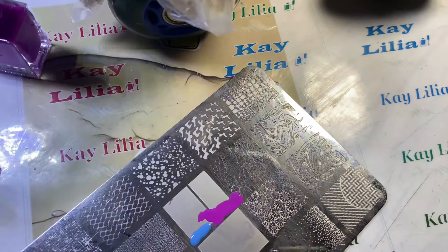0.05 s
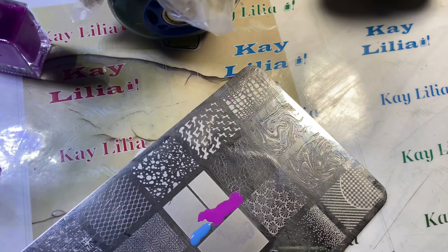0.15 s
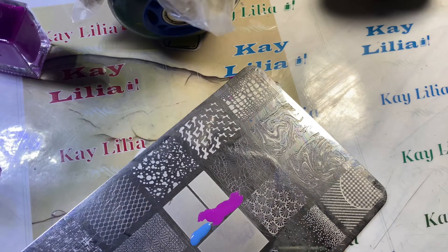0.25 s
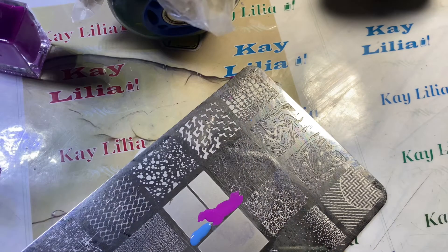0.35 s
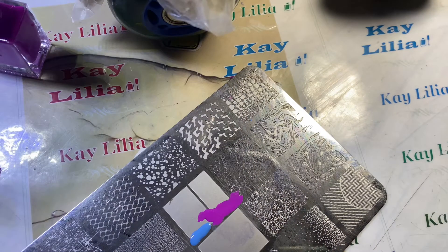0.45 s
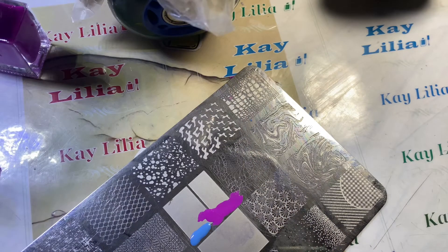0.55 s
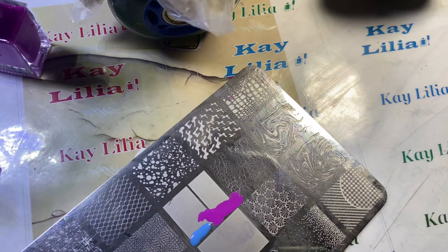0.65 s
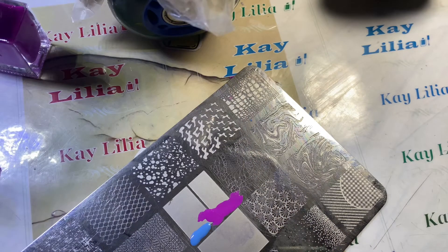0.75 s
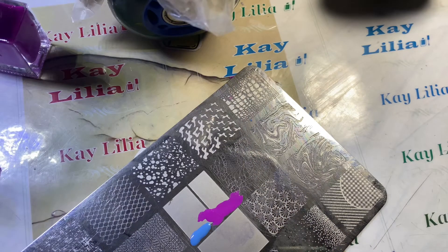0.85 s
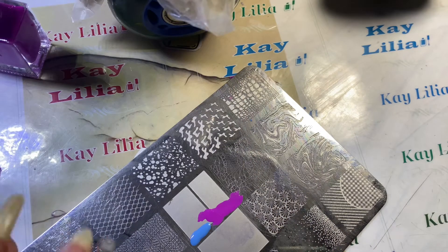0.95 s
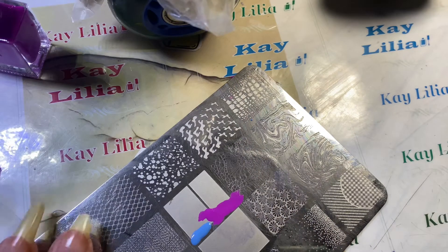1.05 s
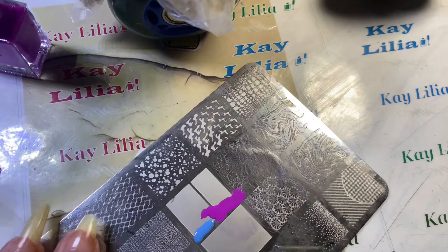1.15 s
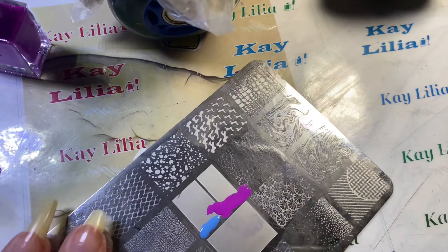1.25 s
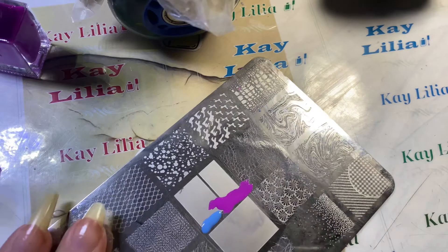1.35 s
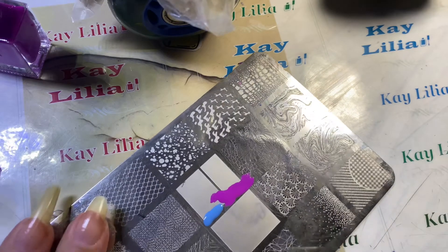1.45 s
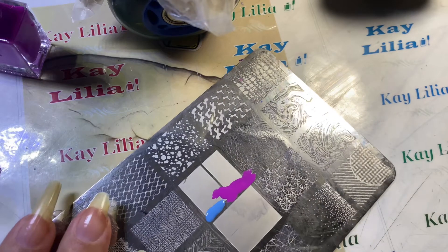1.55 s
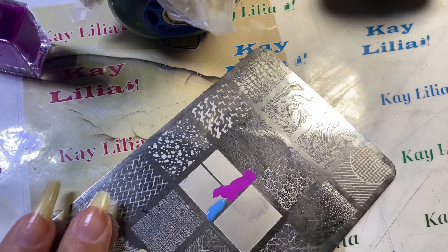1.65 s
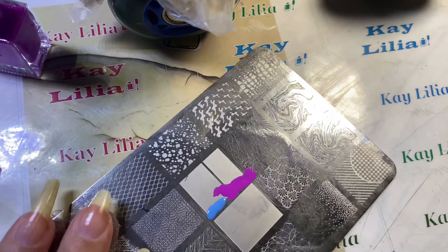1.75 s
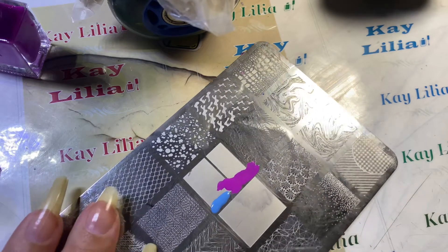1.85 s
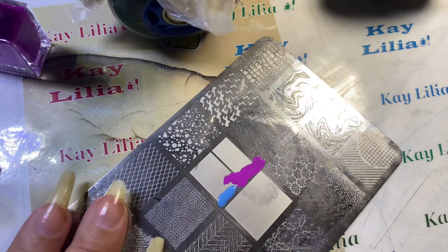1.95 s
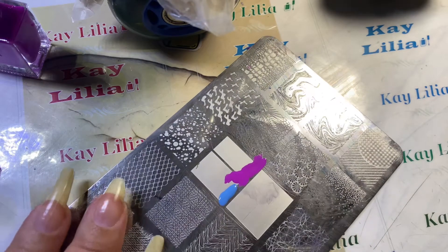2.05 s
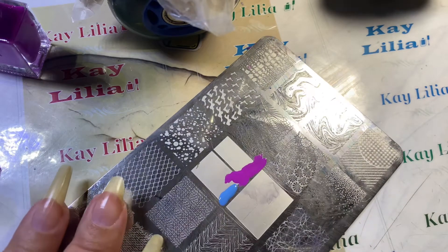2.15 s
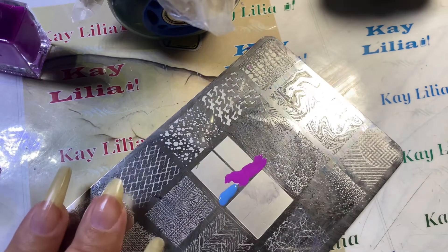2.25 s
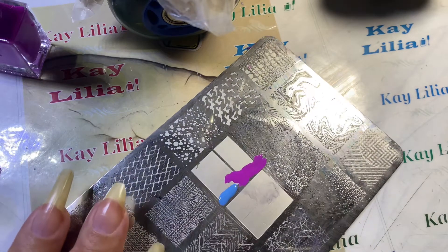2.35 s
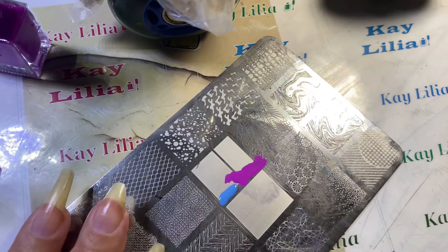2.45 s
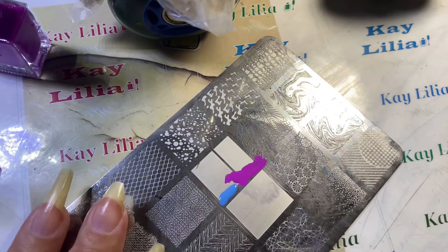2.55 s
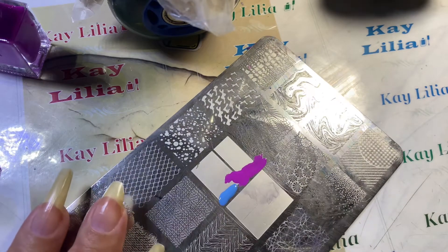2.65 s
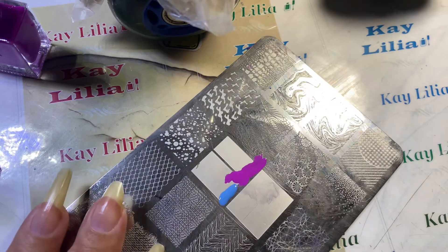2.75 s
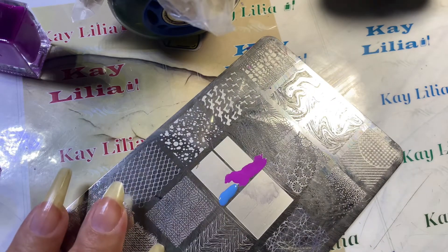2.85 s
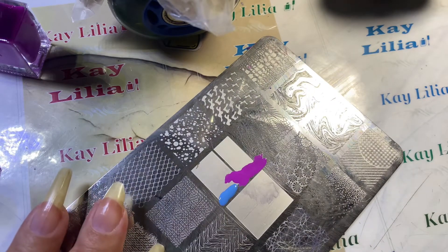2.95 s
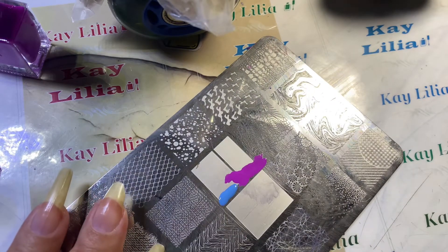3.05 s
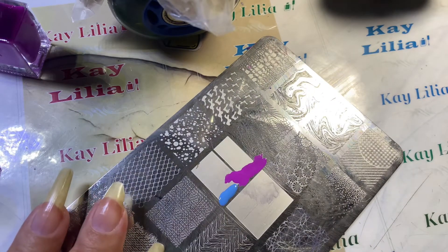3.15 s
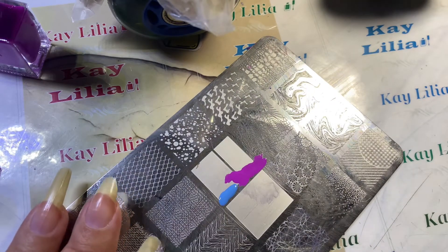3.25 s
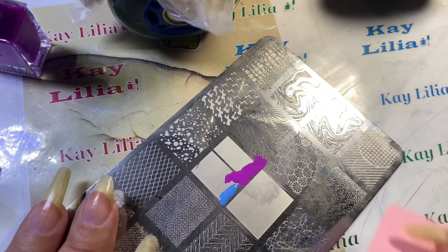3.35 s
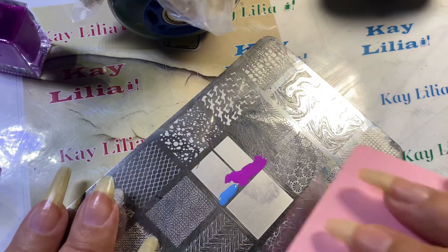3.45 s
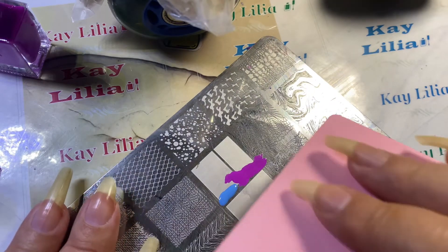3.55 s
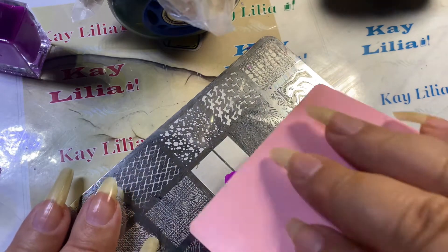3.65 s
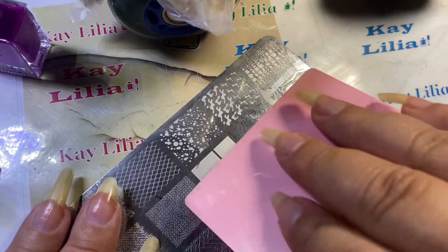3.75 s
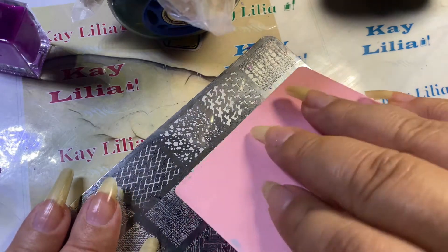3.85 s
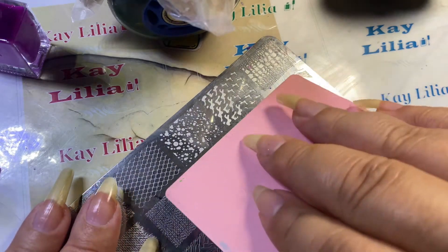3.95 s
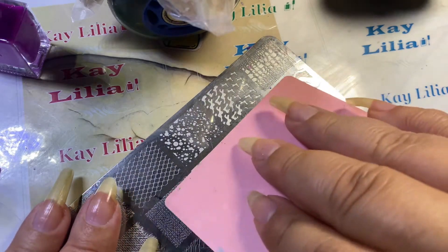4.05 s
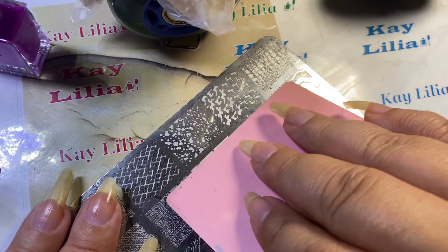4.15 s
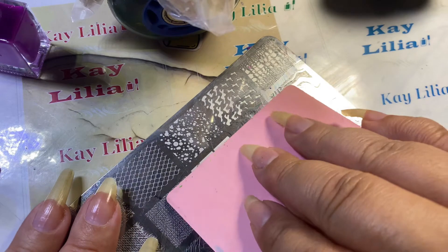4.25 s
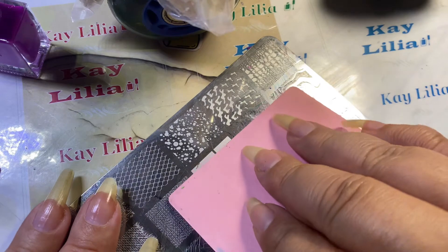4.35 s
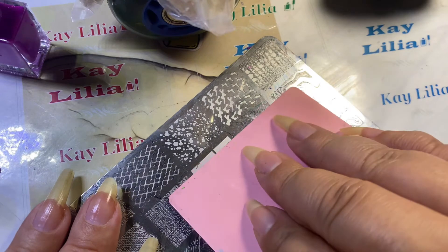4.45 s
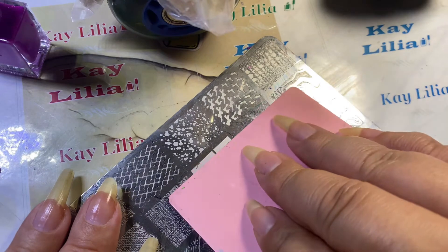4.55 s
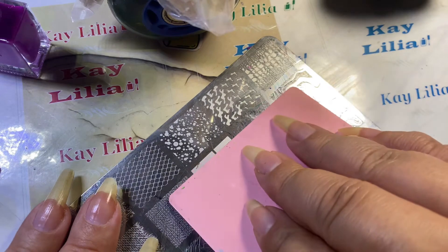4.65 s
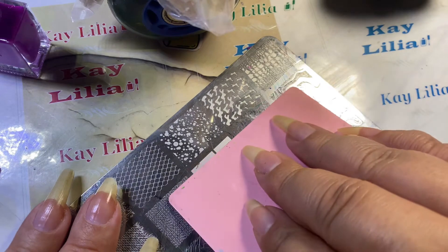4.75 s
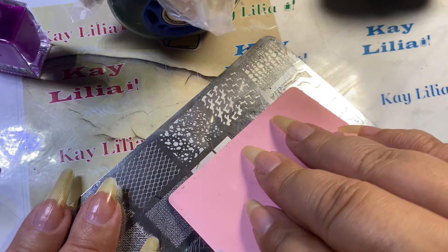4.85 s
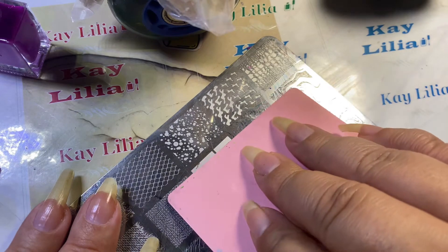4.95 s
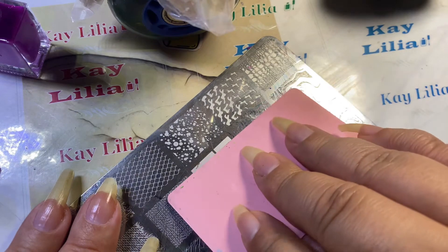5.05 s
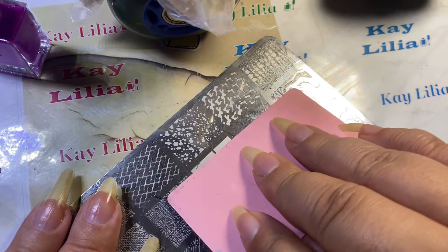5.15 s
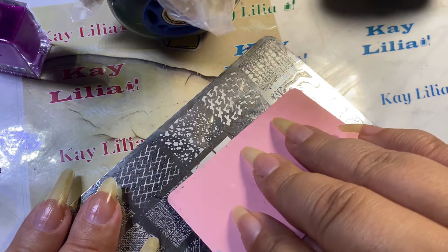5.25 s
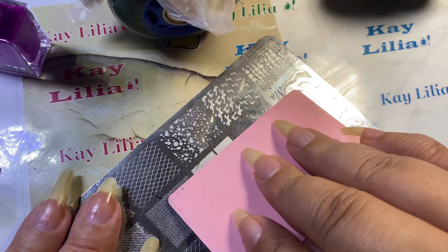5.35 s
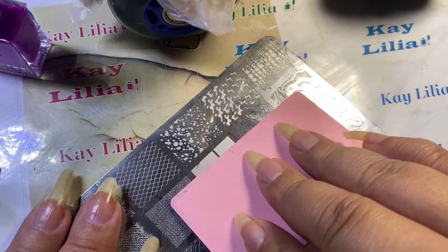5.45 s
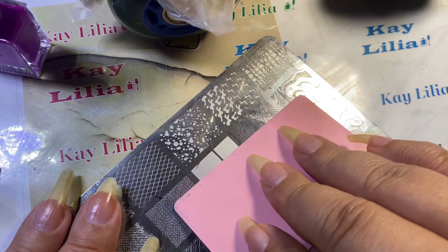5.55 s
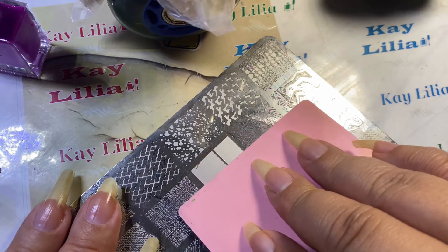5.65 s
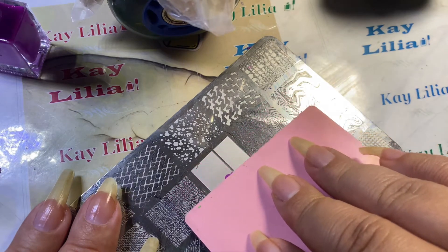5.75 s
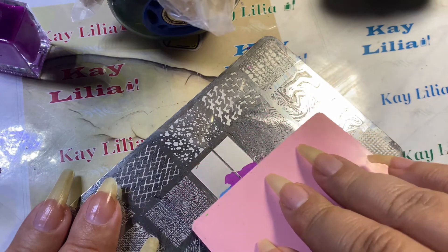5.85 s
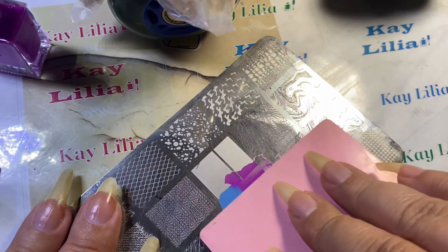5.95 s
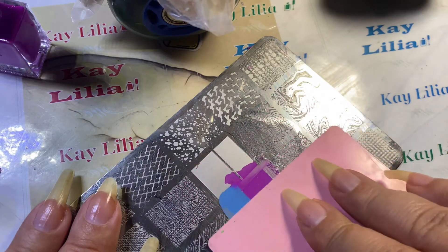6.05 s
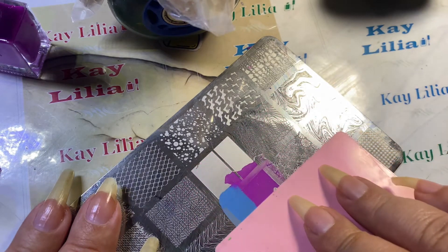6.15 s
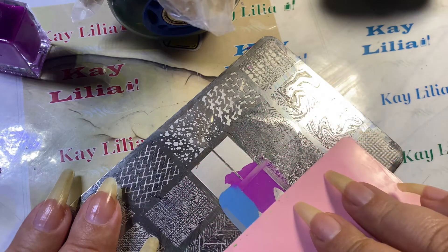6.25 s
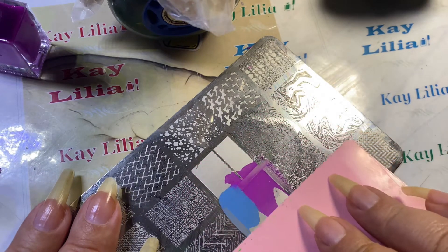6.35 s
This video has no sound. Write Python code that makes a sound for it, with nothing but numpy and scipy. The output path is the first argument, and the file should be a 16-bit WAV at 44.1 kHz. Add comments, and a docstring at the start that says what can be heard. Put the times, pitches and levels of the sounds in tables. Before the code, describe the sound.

Over steady motor hum, light nail clicks and brief brushing shuffles give way to a card's clack, one swelling scrape and a bright snap.

```python
"""From the start, appliance motors hum as steady sine tones in a small room, over fan rumble made of noise.
Long fingernails tick on a thin steel plate (impulses ringing its resonances), and fingers slide it over a
plastic-covered craft table (noise in short pushes). After 3.6 s a plastic card is set down on the plate.
At about 4.2 s one more motor starts and beats slowly against the lowest hum tone.
From 5.2 s the card is drawn across the plate in one rasping stroke, and it snaps over an edge at 5.9 s."""
import sys
import numpy as np
from scipy import signal
from scipy.fft import rfft, irfft
from scipy.io import wavfile
from scipy.ndimage import map_coordinates

SR = 44100
rng = np.random.default_rng(int(sys.argv[2]) if len(sys.argv) > 2 else 0)


def int16_out(signal):
    """Quantize to a 16-bit WAV file."""
    q = np.round(np.clip(np.atleast_2d(signal).T, -1, 1) * 32767)
    wavfile.write(sys.argv[1], SR, q.astype(np.int16))


N = 281799

# Resonances of the plate, damped by table and fingers.
# Each row: pitch in Hz, width in Hz, level in dB.
PLATE_MODES = [(500, 220, -13), (870, 200, -1), (1280, 500, -2), (2150, 750, 0), (3400, 700, -3),
               (4700, 1000, -2), (6700, 700, -4), (8200, 900, -8), (10000, 1000, -8), (11600, 800, -13),
               (13200, 1200, -24), (14900, 600, -24)]
# Resonances of card and plate ringing together. Each row: pitch in Hz, width in Hz, level in dB.
CARD_MODES = [(974, 50, -3), (1135, 110, -1), (1300, 160, -11), (1915, 80, -5), (2420, 110, -7),
              (2675, 80, -3), (2950, 130, 2), (3275, 110, -1), (3572, 100, -8), (4300, 160, -10),
              (4620, 220, -6), (4930, 240, -6), (6050, 130, -11), (6595, 120, -7), (7030, 80, -12),
              (7400, 130, -11), (10020, 150, -7), (12100, 120, -12), (15200, 250, -24)]
# How restless the hands are between pushes. Each row: time in seconds, relative level in dB.
RESTLESSNESS = [(0, 8), (0.35, -6), (0.55, -14), (0.9, 1.5), (1.3, -2), (1.45, 2), (1.6, -13), (2.2, 1),
                (2.5, -8.5), (2.8, -1), (3.8, -12.5), (4.6, -15), (6.39, -27)]

# the last motor, and the moment when all hum tones are in step
MOTOR_HZ, MOTOR_START_S, IN_STEP_S = 59.08, 4.16, 5.0
ROOM_T60_S = 0.22  # time for the wall echoes to fall by 60 dB
CUTOFF_HZ = 16000
# reflections from hands and table, just behind each nail contact
SCATTER_DB, SCATTER_T60_S = -0.5, 0.01
NAIL_LAG_S = 0.00004  # delay of a nail's impulse at the right microphone
# every push takes hold over a share of its length, slows under friction and dies away
PUSH_ATTACK_SHARE, PUSH_SAG_DB_PER_S, PUSH_RELEASE_DB_PER_S = 0.42, 29.5, 276
# the card's stroke speeds up and slows down in a half sine; its loudness follows a power of speed
STROKE_START_S, STROKE_LENGTH_S, STROKE_SPEED_POWER = 5.157, 1.454, 3.1
# rubbing resonances: width as a share of pitch, and how far and how often they wander
RUB_WIDTH_SHARE, RUB_WANDER_OCTAVES, RUB_WANDERS_PER_S = 0.1, 0.045, 22
# the shifting contact makes patches of the spectrum flicker
SLIDE_PATCH_DB, EDGE_PATCH_DB, PATCHES_PER_S, PATCHES_PER_OCTAVE = 2.8, 1.5, 50, 10


def from_db(db):
    """Decibels to gain."""
    return 10 ** (np.asarray(db) / 20)


def rms_one(x):
    """Scale to an average (rms) level of 1."""
    return x / np.sqrt(np.mean(x ** 2) + 1e-20)


def seconds(size):
    """A time axis."""
    return np.arange(size) / SR


def level_curve(rows):
    """Gain along rows of time in seconds and level in dB, practically silent outside them."""
    return from_db(np.interp(seconds(N), *np.transpose(rows), left=-140, right=-140))


def at_hz(points, hz):
    """Read a table along pitch, where each octave counts as an equal step."""
    table = np.array(points)
    return np.interp(np.log(np.maximum(hz, 1)), np.log(table[:, 0]), table[:, 1])


def coloured(x, spectrum):
    """Give a steady sound a spectrum and an rms level of 1."""
    gain = from_db(at_hz(spectrum, np.fft.rfftfreq(N, 1 / SR)))
    return rms_one(irfft(rfft(x) * gain, N))


def cut(x, hz, kind):
    """Butterworth filter of design order 2."""
    return signal.sosfilt(signal.butter(2, hz, kind, fs=SR, output="sos"), x)


def drift(rate):
    """Random wandering with spread 1, aiming at a new value `rate` times a second."""
    knots = rng.standard_normal(4000)
    return np.interp(seconds(N) * rate, np.arange(len(knots)), rms_one(knots))


def panned(x, left_db):
    """Shift a sound to the left by a level difference."""
    return x * from_db([[left_db / 2], [-left_db / 2]])


def add(track, s, sound):
    """Mix a short sound in at a time."""
    start = round(s * SR)
    track[:, start:start + sound.shape[1]] += sound[:, :N - start]


def stereo(pair, likeness):
    """Blend two unrelated noises into left and right, as alike as a table says."""
    alike = np.clip(at_hz(likeness, np.fft.rfftfreq(N, 1 / SR)), -1, 1)
    mid, side = rfft(pair)
    return irfft(np.sqrt(1 + alike) * mid + np.sqrt(1 - alike) * side * [[1], [-1]], N)


def resonate(x, modes):
    """Resonances side by side, each ringing at its own pitch, added with alternating signs."""
    out = 0
    for k, (hz, width, db) in enumerate(modes):
        r = np.exp(-np.pi * width / SR)  # a wider resonance dies away faster
        feed = np.array([1, 0, -1]) * (1 - r * r) / 2
        feedback = [1, -2 * r * np.cos(2 * np.pi * hz / SR), r * r]
        ring = signal.lfilter(feed, feedback, x + 1e-18)
        out = out + (-1) ** k * ring * from_db(db)
    return out


def contact(lag_s):
    """A sharp impulse, later at the right microphone, with dense reflections from hands and table."""
    t = seconds(size=6000)
    scatter = rng.standard_normal((2, len(t))) * from_db(-60 * t / SCATTER_T60_S)
    hit = from_db(SCATTER_DB) * rms_one(scatter) / np.sqrt(len(t))
    hit[[0, 1], [0, round(abs(lag_s) * SR)]] += 1
    return hit


def dispersed(bounce, longest_s):
    """A sharp impulse smeared by quick bounces inside the card, which leave its colour unchanged."""
    hit = signal.unit_impulse(6000)
    for delay in (rng.uniform(.3, 1, 3) * longest_s * SR).astype(int):
        loop = np.r_[1, np.zeros(delay), bounce]
        hit = signal.lfilter(loop[::-1], loop, hit)  # allpass: delays pitches without changing levels
    return hit[None]


def friction(per_s, grain_db, smooth_db):
    """Tiny slips of uneven size over a smooth rubbing hiss, as two unrelated noises."""
    sizes = from_db(grain_db * np.minimum(rng.exponential(1, N), 2.8))
    slips = (rng.random(N) < per_s / SR) * sizes
    grains = rms_one(slips * rng.standard_normal((2, N)))
    return grains + from_db(smooth_db) * rng.standard_normal((2, N))


def rubbed(pair, colour, resonances, patch_db):
    """Colour a rub by a spectrum and by resonances that wander and flicker as the contact shifts."""
    hz, t, cells = signal.stft(pair, SR, nperseg=384)
    power = 1
    for centre, height_db in resonances:
        path = np.interp(t * RUB_WANDERS_PER_S, np.arange(400), rng.standard_normal(400))
        detune = hz[:, None] / (centre * 2 ** (RUB_WANDER_OCTAVES * path)) - 1
        power = power + from_db(height_db) ** 2 / (1 + (2 * detune / RUB_WIDTH_SHARE) ** 2)
    octaves = np.log2(1 + hz / 100)
    places = np.meshgrid(octaves * PATCHES_PER_OCTAVE, t * PATCHES_PER_S, indexing="ij")
    # the patch grid ends near 7.8 kHz; above that nothing flickers
    patches = map_coordinates(rng.standard_normal((64, 400)), places, order=1)
    gain = np.sqrt(power) * from_db(at_hz(colour, hz)[:, None] + patch_db * rms_one(patches))
    return rms_one(signal.istft(cells * gain, SR)[1][:, :pair.shape[1]])


def radiated(x):
    """Each register of the card leans to one microphone in level and is ahead in phase at the left."""
    # How the card's sound leans. Each row: pitch in Hz, left minus right in dB.
    balance = [(700, -9), (1290, -3), (2380, 2.5), (4400, 6), (8120, -2.5), (15000, 1.5)]
    # How far it leads at the left microphone. Each row: pitch in Hz, lead in radians.
    phase = [(0, 1), (340, 3.5), (1120, 4.5), (3100, 10.5), (4820, 19), (5250, 23.5), (7580, 17.5),
             (8180, 16.5), (9560, 16), (10400, 12), (11600, 11), (13800, 10.5), (14600, 11), (16500, 5)]
    hz = np.fft.rfftfreq(N, 1 / SR)
    left_db = at_hz(balance, hz)
    lead = np.interp(hz, *np.transpose(phase))
    gain = from_db([left_db / 2, -left_db / 2])
    return irfft(rfft(x) * gain * np.exp(np.array([lead, -lead]) * 1j / 2), N)


def room_air(level_db):
    """Fan rumble and air: noise strongest in the bass, where the two channels are most alike."""
    # Spectrum of the air. Each row: pitch in Hz, relative level in dB per Hz.
    spectrum = [(25, -18), (38, -6), (48, -6), (65, -1), (95, -7.5), (128, 2), (168, -8.5), (186, -1.5),
                (222, -9.5), (262, -9.5), (305, -10), (380, -15.5), (650, -24.5), (1100, -22.5),
                (1450, -29), (1950, -29), (3100, -39), (4000, -44), (8000, -56.5), (15000, -76.5)]
    # Likeness of the two channels. Each row: pitch in Hz, likeness from -1 to 1.
    likeness = [(60, 0.64), (130, 1), (290, 0.59), (640, 0.0098), (1400, 0.012), (15000, 0.15)]
    air = stereo(rng.standard_normal((2, N)), likeness)
    return panned(coloured(air, spectrum), left_db=2.5) * from_db(level_db)


def motors(hum_db, motor_db, jolt_db, waver_db):
    """Steady hum tones; a further motor starts with a low jolt and beats with the slowest one."""
    # Motor hum. Each row: pitch in Hz, relative level in dB before the last motor starts,
    # relative level in dB after.
    tones = [(57.57, -48.5, -47), (76.07, -51, -51), (114.1, -55, -55), (119.6, -49.5, -56.5),
             (190.1, -52.5, -53.5), (239.8, -58.5, -58.5), (278.2, -65, -65), (359.4, -73, -71),
             (470.3, -75, -75)]
    # The slowest motor swells and eases. Each row: time in seconds, change in dB.
    slowest_swell = [(0, 2), (1.0, 1), (2.2, 5), (3.2, 5), (4.1, 2.5), (6.4, 3.5)]
    t = seconds(N)
    running = np.clip((t - MOTOR_START_S) / 0.082 + .5, 0, 1)  # fades in over 82 ms
    out = from_db(motor_db) * running * np.sin(2 * np.pi * MOTOR_HZ * (t - IN_STEP_S))
    for k, (hz, before_db, after_db) in enumerate(tones):
        db = before_db + (after_db - before_db) * running + hum_db + waver_db * drift(rate=3.8)
        swell = level_curve(slowest_swell) if k == 0 else 1
        out = out + swell * from_db(db) * np.sin(2 * np.pi * hz * (t - IN_STEP_S))
    thump = rms_one(cut(rng.standard_normal(N), [55, 140], "band"))
    jolt = thump * np.exp(-((t - MOTOR_START_S) / 0.12) ** 2)
    return panned(np.sqrt(2) * out + from_db(jolt_db) * jolt, left_db=0.6)


def room(x, early_db, early_t60, late_db, wall_hz):
    """Quick reflections from the clutter on the table, with a longer, duller tail from the walls."""
    t = seconds(size=24000)
    early, late = rng.standard_normal((2, 2, len(t))) * np.clip(t / 0.00098, 0, 1)
    early = rms_one(early * from_db(-60 * t / early_t60))
    late = rms_one(cut(late, wall_hz, "low") * from_db(-60 * t / ROOM_T60_S))
    response = (from_db(early_db) * early + from_db(late_db) * late) / np.sqrt(len(t))
    return signal.fftconvolve(x, response, axes=1)[:, :N]


def grazes(per_s, level_db):
    """Now and then a nail barely brushes the plate, harder while the hands are restless."""
    strength = rng.uniform(0.13, 1, N) * level_curve(RESTLESSNESS) * from_db(level_db)
    touches = (rng.random(N) < per_s / SR) * strength
    tick = cut(resonate(contact(NAIL_LAG_S), PLATE_MODES), 2500, "high")
    return signal.fftconvolve(touches[None], tick, axes=1)[:, :N]


def push_envelope(t, length):
    """A push rises, sags slowly while it lasts, then dies away quickly."""
    fall_db = PUSH_SAG_DB_PER_S * t + PUSH_RELEASE_DB_PER_S * np.maximum(t - length, 0)
    return np.minimum(t / (PUSH_ATTACK_SHARE * length), 1) * from_db(-fall_db)


def sliding(level_db, second_db, creep_db):
    """Skin and steel rub over the plastic sheet in short brushing pushes, each with two resonances."""
    # Pushes that slide fingers, card and plate over the table cover.
    # Each row: start in seconds, length in seconds, level in dB, tilt in dB per octave,
    # main resonance in Hz, second resonance in Hz, resonance height in dB (second_db shifts the second).
    pushes = [(0.059, 0.03, -50.5, 2, 4260, 3020, 9), (0.203, 0.093, -57, -6, 1320, 1850, 15),
              (0.208, 0.11, -62, -5.5, 6030, 4730, 15), (0.434, 0.078, -60, -5.5, 517, 750, 19),
              (0.577, 0.11, -68, -2, 4200, 11000, 0), (0.789, 0.048, -55, -0.5, 14400, 10900, 9),
              (0.972, 0.014, -50, -1, 3440, 5800, 7), (0.997, 0.045, -61.5, 11.5, 4870, 3540, 11),
              (1.08, 0.067, -70, -4, 11500, 4500, 4), (1.138, 0.12, -64.5, -6.5, 4560, 6950, 9),
              (1.507, 0.042, -69.5, -1.5, 7100, 11500, -5), (1.615, 0.022, -61, 0.5, 13000, 12000, 6),
              (1.70, 0.038, -60.5, -2, 4450, 11500, -1), (1.761, 0.094, -64.5, -1, 4500, 10800, 7),
              (1.847, 0.082, -61.5, -1.5, 11500, 3800, 5), (1.876, 0.01, -64.5, -1, 4900, 3900, 21),
              (2.173, 0.063, -62.5, -2.5, 4400, 1910, -5), (2.222, 0.029, -59, 0.5, 4700, 6000, -1),
              (2.3, 0.041, -63, 1.5, 4300, 3400, 9), (2.647, 0.052, -63, 2, 9600, 10600, 20),
              (2.65, 0.006, -61, -1, 5750, 6500, 24), (2.72, 0.037, -64, -2, 5500, 10500, -3),
              (2.786, 0.03, -65.5, 0.5, 5560, 4000, 2), (2.848, 0.038, -70, -1.5, 10400, 6500, 0),
              (2.981, 0.055, -59, 1, 8900, 5500, 14), (3.06, 0.04, -73, 2, 5400, 9400, 5),
              (3.12, 0.059, -77, 13, 10600, 7500, 6), (3.205, 0.068, -65, -4, 6230, 10600, -2),
              (3.422, 0.058, -71, -2.5, 5000, 11000, 4), (3.523, 0.076, -75.5, 0, 5000, 10900, 2),
              (3.682, 0.048, -62, -4.5, 1260, 4570, -8), (3.958, 0.092, -64.5, -4.5, 7600, 4750, 5),
              (4.13, 0.16, -65, -5.5, 3150, 1190, 13), (4.862, 0.007, -60.5, -6.5, 3340, 4430, 16),
              (4.941, 0.095, -67, 0, 12500, 4860, 7), (5.942, 0.014, -52.5, -6, 2500, 6000, -4)]
    # Spectrum of the rubbing. Each row: pitch in Hz, relative level in dB per Hz.
    slide_colour = [(250, -3), (500, -6.5), (1000, 2), (2000, 1), (3200, 0.5), (4800, 2), (7000, -0.5),
                    (9000, -0.5), (11800, 0), (13500, -6), (15500, -11)]
    # Likeness of the two channels for close rubbing, which turns over with pitch in the treble.
    # Each row: pitch in Hz, likeness, limited to between -1 and 1 when used.
    likeness = [(1000, -0.094), (3500, 0.2), (5500, -0.24), (7000, 0.64), (9200, -1.35), (11300, 1),
                (13500, -1.8), (15500, 0.6)]
    rub = stereo(friction(per_s=1400, grain_db=3.6, smooth_db=-1.0), likeness)
    # the hand is never quite still
    creep = level_curve(RESTLESSNESS) * from_db(creep_db + 2.0 * drift(rate=8.8))
    out = rubbed(rub, slide_colour, [], SLIDE_PATCH_DB) * creep
    for s, length, db, tilt_db, main_hz, second_hz, height_db in pushes:
        piece = rub[:, round(s * SR):][:, :SR // 2]
        colour = [(hz, colour_db + tilt_db * np.log2(hz)) for hz, colour_db in slide_colour]
        resonances = [(main_hz, height_db), (second_hz, height_db + second_db)]
        sound = rubbed(piece, colour, resonances, SLIDE_PATCH_DB)
        envelope = push_envelope(seconds(piece.shape[1]), length)
        add(out, s, sound * envelope * from_db(db + level_db))
    return panned(out, left_db=1.0)


def card_stroke(level_db, ring_db, flutter_db, spread_db):
    """The card's edge glides over the engraving in a dense rasp and faintly rings card and plate."""
    # Hiss of the card's edge. Each row: pitch in Hz, relative level in dB per Hz.
    edge_hiss = [(600, -26), (1000, -8.5), (1450, -7), (1900, -4.5), (2400, -5), (3100, -8), (4000, -9.5),
                 (4900, -8.5), (7500, -10), (9000, -16), (11800, -13.5), (13300, -25), (16000, -30)]
    # Resonances of the sliding card. Each row: pitch in Hz, height in dB.
    edge_resonances = [(1200, 8), (3100, 8.5), (4900, 0)]
    speed = np.sin(np.pi * np.clip((seconds(N) - STROKE_START_S) / STROKE_LENGTH_S, 0, 1))
    centre, ends = friction(per_s=1800, grain_db=3.2, smooth_db=1.0)
    rub = centre + from_db(spread_db) * np.array([ends, -ends])
    rasp = rubbed(rub, edge_hiss, edge_resonances, EDGE_PATCH_DB)
    sound = rasp + from_db(ring_db) * rms_one(resonate(rub, CARD_MODES))
    loudness = np.abs(speed) ** STROKE_SPEED_POWER * from_db(level_db + flutter_db * drift(rate=60))
    return radiated(rms_one(sound)) * loudness


def card_catches(level_db, low_hz):
    """The card lands with a knock, its edge drops into grooves and snaps free, ringing with the plate."""
    # The card landing on the plate, catching on engraved edges and snapping free.
    # Each row: time in seconds, relative level in dB, free ringing in dB, extra body in dB.
    catches = [(3.6707, -66.5, -6, 3), (3.864, -67, 3, 0), (4.1152, -44.5, -7, 8), (4.13, -52, -7, 5),
               (4.1569, -41, -5, 4), (4.3825, -62, -6, -6), (4.444, -56, -17, 3), (4.8696, -64, -6.5, 0),
               (5.5124, -65, 1.5, 0), (5.6474, -51, -2, 7), (5.77, -56, -4, 2), (5.843, -55.5, -7, 9),
               (5.9363, -62, -26, 0), (5.9422, -24.5, -5, -2), (5.961, -55, -8, 4)]
    # The card's own short crack. Each row: pitch in Hz, width in Hz, level in dB before extra body.
    crack = [(1124, 210, 7.5), (2140, 890, -1.5), (2900, 810, 5.5), (4870, 1450, 1), (6500, 1400, 2),
             (8600, 1900, -6), (10350, 440, -3.5), (12900, 930, -12.5)]
    out = np.zeros((2, N))
    for s, db, ring_db, body_db in catches:
        hit = dispersed(bounce=0.77, longest_s=0.0005)
        modes = np.array(crack, float)
        modes[0, 2] += body_db  # a flat landing favours the lowest mode
        ringing = rms_one(resonate(hit, CARD_MODES))
        sound = rms_one(resonate(hit, modes)) + from_db(ring_db) * ringing
        add(out, s, rms_one(sound) * from_db(db + level_db))
    return radiated(cut(out, low_hz, "high"))  # a small card radiates little bass


def taps(level_db, spot_db):
    """Each nail touch knocks the damped plate, with its own share of low body and high edge."""
    # Nails touching the plate. Each row: time in seconds, relative level in dB, body in dB,
    # edge in dB (both against the middle), left minus right in dB.
    touches = [(0.1099, -43.5, -6.5, 3, 9), (0.318, -60.5, -2, -8, 12), (0.4123, -55.5, -30, -4, 12),
               (0.4292, -43.5, -2, -7.5, 9), (0.6145, -52, -3, -3, 8), (0.6487, -54, 10, 2, -1),
               (0.6657, -44.5, -7.5, -3, 8), (0.722, -32, -6.5, -10.5, 7), (0.74, -32.5, -3, -11.5, 3),
               (0.9653, -52, -3, -9, 2), (0.9768, -39.5, -42, 1, 9.5), (1.0108, -51.5, -30, -23, 9),
               (1.1104, -61, -11, -9, 12), (1.7077, -48, 5, -30, 1), (1.9558, -39, -2, 1, 0.5),
               (1.9665, -44.5, 1, -3, 0), (2.071, -34, -7.5, -9.5, 1.5), (2.1565, -35.5, -4.5, -11.5, -1.5),
               (2.395, -59, -1, -7, -1), (2.503, -63.5, -18, 5, 7), (2.5847, -62.5, -21, 4.5, 5.5),
               (2.6277, -34.5, -1, 5.5, 1.5), (2.6561, -57.5, 0, -13, -18), (2.684, -67, -20, 12, -2),
               (3.198, -53.5, 2, -2, 0), (3.7074, -64.5, 1.5, -2, 13), (4.911, -69, -20, -4, 1),
               (4.9571, -59.5, -24, -6, 6), (5.264, -74, -12, -1, 8), (5.403, -65.5, -18, 0, 1)]
    out = np.zeros((2, N))
    for s, db, body_db, edge_db, left_db in touches:
        hit = contact(NAIL_LAG_S)
        modes = np.array(PLATE_MODES, float)
        modes[:, 2] += spot_db * rng.standard_normal(len(modes))  # each spot favours other modes
        low, high = modes[:, 0] < 1500, modes[:, 0] > 7500
        body = rms_one(resonate(hit, modes[low]))
        middle = rms_one(resonate(hit, modes[~low & ~high]))
        edge = rms_one(resonate(hit, modes[high]))
        knock = from_db(body_db) * body - middle - from_db(edge_db) * edge
        add(out, s, panned(rms_one(knock), left_db) * from_db(db + level_db))
    return out


def scene():
    """Handling sounds close by, in a humming room."""
    air = room_air(level_db=-53.5)
    hum = motors(hum_db=-5.0, motor_db=-43.0, jolt_db=-47.0, waver_db=1.5)
    brushes = grazes(per_s=4.8, level_db=-44.0)
    rubbing = sliding(level_db=0.0, second_db=-3.0, creep_db=-73.0)
    stroke = card_stroke(level_db=-58.0, ring_db=-23.0, flutter_db=1.2, spread_db=-7.5)
    clicks = taps(level_db=-15.0, spot_db=-0.5) + card_catches(level_db=-15.0, low_hz=800)
    hands = clicks + rubbing + stroke + brushes
    echoes = room(hands, early_db=-10.5, early_t60=0.029, late_db=-17.0, wall_hz=8800)
    return hands + echoes + hum + air


def record(dry):
    """The top of the treble is cut steeply."""
    return signal.sosfilt(signal.ellip(10, .2, 80, CUTOFF_HZ, fs=SR, output="sos"), dry)


dry = scene()
out = record(dry)
int16_out(out)
```